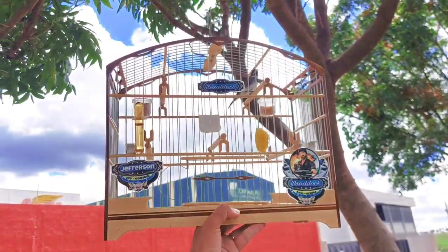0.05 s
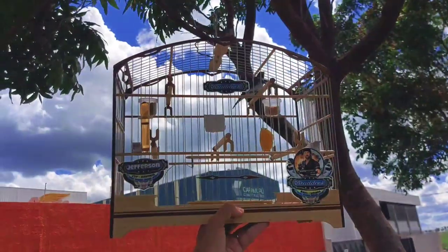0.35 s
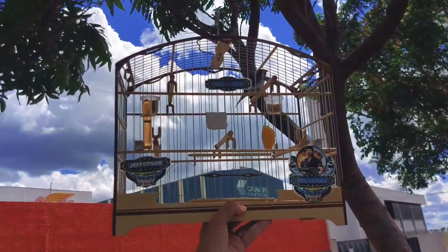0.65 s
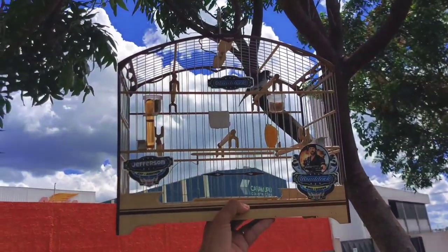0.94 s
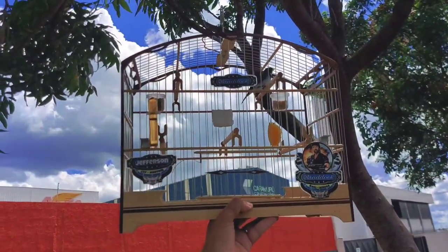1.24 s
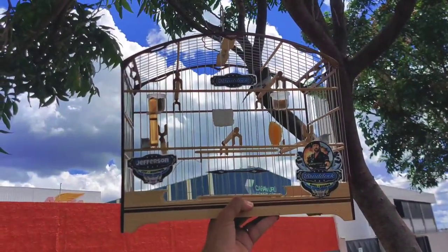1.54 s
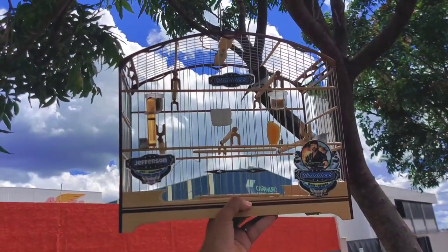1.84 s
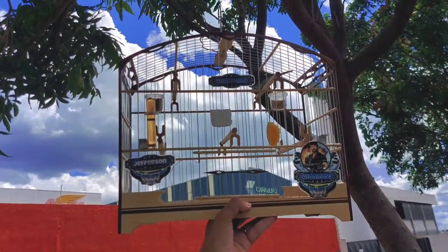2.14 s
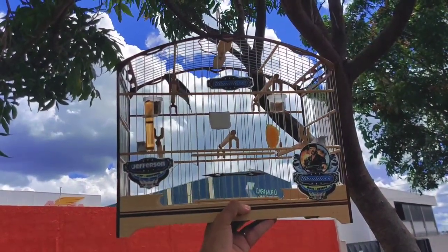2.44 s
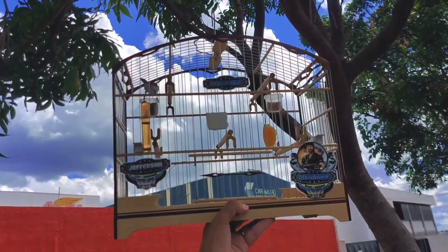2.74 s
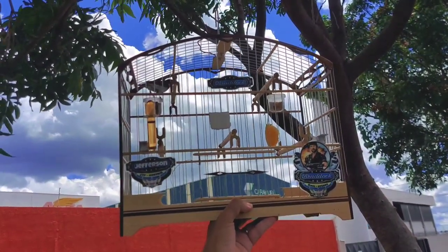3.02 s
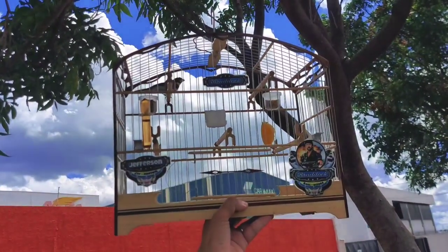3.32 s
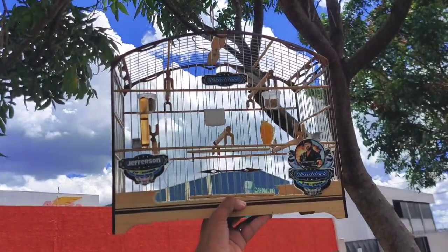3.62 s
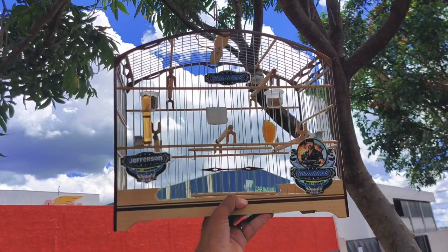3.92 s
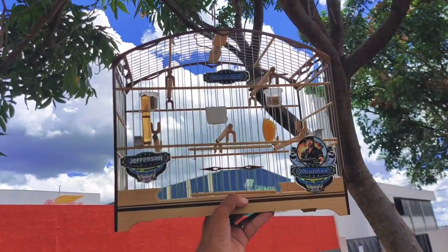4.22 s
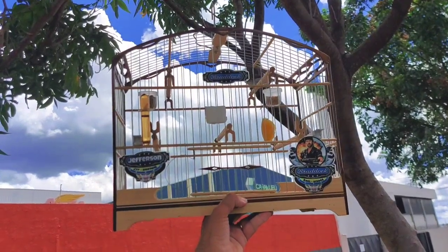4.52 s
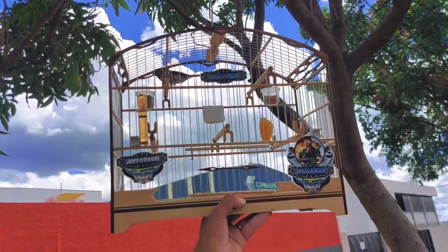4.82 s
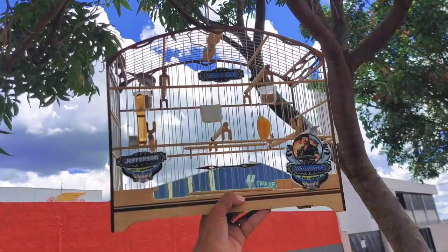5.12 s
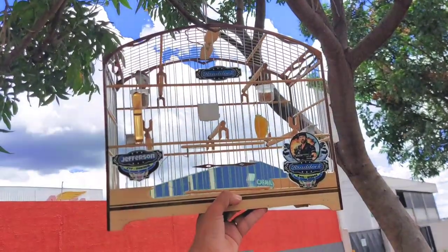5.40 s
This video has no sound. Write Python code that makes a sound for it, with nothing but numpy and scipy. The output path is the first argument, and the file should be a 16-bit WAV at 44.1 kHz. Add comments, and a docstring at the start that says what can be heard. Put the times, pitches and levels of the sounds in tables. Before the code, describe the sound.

Close to the microphone, a small caged bird opens with a reedy buzz, a rising whistle and two fast tumbling runs. After that, only quieter birds are heard: thin falling calls far off and scattered chirps in the trees. Wings rustle faintly and feet tick on perches, while a second bird replies with whistles, slurs and a short trill. Light wind, distant traffic and hissing leaves continue underneath.

```python
"""Light wind, distant traffic and hissing leaves run throughout. At once a caged seedeater under a tree
sings a reedy buzz, a rising whistle and two tumbling runs, tones of its syrinx that a garden wall echoes.
As it ends, a far bird starts repeating a thin falling 'tsee'; then others chirp in the trees.
A faint, far nasal call sounds from 2.3 to 2.85 s, as wings start to rustle and feet tick on the perches.
From about 3 s a second bird replies with whistles, slurs and a trill, followed by a faint echo."""
import sys
import numpy as np
from scipy import signal
from scipy.fft import rfft, irfft, next_fast_len
from scipy.io import wavfile
from scipy.ndimage import map_coordinates

SR = 44100
rng = np.random.default_rng(int(sys.argv[2]) if len(sys.argv) > 2 else 0)


def bounce(signal):
    """Save signal as a 16-bit WAV file at the path given by the first command-line argument."""
    frames = np.transpose(np.atleast_2d(signal))
    limited = np.clip(frames, -1, 1)
    pcm = np.round(limited * 32767).astype(np.int16)
    wavfile.write(sys.argv[1], SR, pcm)


N = 245195
TIME_S = np.arange(N) / SR
SIDES = np.array([[.5], [-.5]])  # splits a left-right difference


def amp(db):
    """Amplitude from dB."""
    return 10 ** (np.asarray(db) / 20)


def along(points, hz):
    """Interpolate (Hz, value) points on a log axis."""
    knots_hz, values = np.transpose(points)
    return np.interp(np.log(hz + 1), np.log(knots_hz + 1), values)


def curve(points):
    """Interpolate (seconds, value) points at every sample."""
    return np.interp(TIME_S, *np.transpose(points))


def wobble(rate_hz):
    """Smooth random curve, rate_hz knots a second."""
    knots = rng.standard_normal(int(N * rate_hz / SR) + 4)
    return map_coordinates(knots, [TIME_S * rate_hz])


def filtered(x, response):
    """Apply a complex response, given as a function of Hz."""
    size = next_fast_len(N + SR // 2)
    return irfft(rfft(x, size) * response(np.fft.rfftfreq(size, 1 / SR)), size)[..., :N]


def note(start_s, end_s, edge_s):
    """Sample indices of a note, its progress 0-1 and its soft-edged gate."""
    i = np.arange(max(int(start_s * SR), 0), min(int(max(end_s, start_s + .004) * SR), N))
    u = np.linspace(0, 1, len(i))
    ramp = np.clip(np.minimum(u, 1 - u) * len(i) / SR / edge_s, 0, 1)
    return i, u, np.sin(ramp * np.pi / 2) ** 2


def arch(u, first, middle, last):
    """Parabola through three values over a note."""
    return middle + (last - first) * (u - .5) + 2 * (first + last - 2 * middle) * (u - .5) ** 2


def phase_of(hz):
    """Running phase of a moving frequency."""
    return 2 * np.pi * np.cumsum(hz) / SR


def saw(phase):
    """Rounded swing: quick rise, slow fall."""
    return np.sin(phase) + np.sin(2 * phase) / 3


def placed(x, lag_ms):
    """A source to one side reaches the left channel lag_ms later."""
    return filtered(x, lambda hz: np.exp(-2j * np.pi * hz * SIDES * lag_ms / 1000))


def diffuse(x, decay):
    """Dense reflections, different at each ear, dying away by (Hz, t60 in seconds) points."""
    hz, t, spectra = signal.stft(rng.standard_normal((2, SR // 2)), SR, nperseg=256)
    tail = signal.istft(spectra * amp(-60 * t / along(decay, hz)[:, None]), SR, nperseg=256)[1]
    return signal.fftconvolve(x[None], tail / np.linalg.norm(tail[0]), axes=1)[:, :N]


# Stereo likeness of noise. Each row: frequency in Hz, left-right correlation.
CORRELATION = [(40, 0.53), (120, 0.4), (300, 0.84), (600, 0.5), (1100, -0.65), (2000, 0.037), (3000, 0.055),
               (6000, 0.064)]

def rush(spectrum):
    """Stereo noise of rms 1 shaped by (Hz, dB) points, alike in the bass, unrelated in the treble."""
    def response(hz):
        angle = np.arccos(np.clip(along(CORRELATION, hz), -1, 1)) / 2
        return amp(along(spectrum, hz)) * [np.cos(angle), np.sin(angle)]
    mid, side = filtered(rng.standard_normal((2, N)), response)
    noise = np.array([mid + side, mid - side])
    return noise / np.sqrt(np.mean(noise ** 2) + 1e-20)


# Wind rumble. Each row: frequency in Hz, relative density in dB.
WIND_SPECTRUM = [(12, -42), (20, -29), (53, -2), (97, -0.5), (114, -7), (135, -5), (195, -20.5),
                 (260, -20.5), (340, -25.5), (570, -120)]
# Gusts. Each row: start in seconds, length in seconds, level in dB.
WIND_GUSTS = [(0.124, 0.047, -46.5), (0.379, 0.023, -50), (0.491, 0.079, -38.5), (0.772, 0.1, -47.5),
              (1.349, 0.059, -45), (1.573, 0.11, -47), (1.813, 0.14, -41.5), (2.142, 0.079, -42),
              (2.275, 0.054, -49.5), (2.422, 0.019, -44), (2.527, 0.03, -42), (3.094, 0.035, -40),
              (3.34, 0.045, -45.5), (3.522, 0.095, -47), (3.836, 0.044, -49), (4.023, 0.079, -45.5),
              (4.168, .012, -50), (4.234, 0.013, -50), (4.49, 0.021, -43), (5.032, 0.09, -44),
              (5.26, 0.028, -49.5), (5.47, 0.076, -44)]

def wind(calm_db=-52.5, crest_db=2):
    """Wind buffets the microphones: a restless rumble that swells with each gust."""
    power = amp(calm_db + 3.3 * wobble(7.1)) ** 2
    for start, length, db in WIND_GUSTS:
        width_s = .0083 + .4 * length
        power += amp(db + crest_db) ** 2 * np.exp(-((TIME_S - start - length / 2) / width_s) ** 2)
    return np.sqrt(power) * rush(WIND_SPECTRUM)


# Tyre roar over time. Each row: time in seconds, level in dB.
TYRE_LEVELS = [(0.0, -49), (0.06, -55), (0.66, -56), (0.9, -58.5), (2.14, -56), (2.32, -52.5), (2.34, -56),
               (5.56, -57)]
# Its colour. Each row: frequency in Hz, relative density in dB.
TYRE_SPECTRUM = [(110, -4), (180, 2), (249, -5), (335, -2.5), (398, -7.5), (502, -5.5), (778, -16),
                 (973, -13.5), (1300, -17), (1690, -27), (2860, -120)]

def tyres(gain_db=3, flutter_db=.7):
    """Distant tyres roar on the road, fluttering slightly."""
    return amp(curve(TYRE_LEVELS) + gain_db + flutter_db * wobble(9)) * rush(TYRE_SPECTRUM)


# Engine drone. Each row: time in seconds, level in dB.
ENGINE_LEVELS = [(0, -48.5), (.5, -61.5), (.8, -57), (1.4, -64), (1.78, -38.5), (2.03, -55), (2.17, -41.5),
                 (2.95, -57.5), (3.6, -47.5), (3.78, -65), (4.08, -45), (4.35, -69), (5.25, -64),
                 (5.54, -42)]

def engine(hz=108, jitter=.06, waver_db=3.2, waver_hz=28):
    """A far engine drones on one unsteady tone."""
    level_db = curve(ENGINE_LEVELS) + waver_db * wobble(waver_hz)
    pitch = hz * (1 + jitter * wobble(waver_hz))
    return amp(level_db) * np.sin(phase_of(pitch))


# Leaf hiss. Each row: frequency in Hz, relative density in dB.
LEAF_SPECTRUM = [(500, -13), (1100, -38), (1500, -7), (2100, -3.5), (2650, -13), (4000, -7), (5500, -11),
                 (7500, -14.5), (10000, -21.5), (12500, -18.5), (14500, -24.5), (15500, -52)]

def leaves(level_db=-63):
    """Leaves hiss almost steadily."""
    return amp(level_db + .31 * wobble(4.72)) * rush(LEAF_SPECTRUM)


# Feet on perch and bars. Each row: time in seconds, relative peak in dB.
FOOT_TICKS = [(2.5105, -62), (2.842, -48), (3.148, -41.5), (4.8576, -53), (5.175, -41)]
# Wing flutters. Each row: middle in seconds, half length in seconds, level in dB.
WING_FLUTTERS = [(2.57, .13, -69), (2.78, .07, -69), (3.13, .05, -65), (3.6, .08, -68), (4.78, .1, -69),
                 (5.52, .06, -69)]

def hops(tick_t60_s=.0064, wingbeat_hz=27, beat_db=4.2):
    """Claws tick and wings rustle in quick beats, both as bursts of bright noise."""
    ticks = sum(amp(db - 5 - 60 * np.abs(TIME_S - s) / tick_t60_s) * (TIME_S >= s)
                for s, db in FOOT_TICKS)
    wings = sum(amp(db) * np.exp(-((TIME_S - s) / half) ** 2) for s, half, db in WING_FLUTTERS)
    beats = amp(beat_db * np.sin(2 * np.pi * wingbeat_hz * TIME_S))
    return (ticks + wings * beats) * rush([(500, -18), (2000, -3.5), (6000, 2), (9000, -6), (15000, -19)])


# Thin high calls. Each row: start in seconds, level in dB.
TSEE_CALLS = [(0.836, -56.5), (1.546, -56), (2.185, -54.5), (2.946, -58.5), (3.365, -56.5), (3.936, -55.5),
              (4.649, -58.5)]
# One call's contour. Each row: seconds into the call, pitch in Hz, gain in dB.
TSEE_CONTOUR = [(0, 9250, -8.5), (0.032, 9470, -4.5), (0.047, 8540, -3), (.065, 8500, -7.5),
                (0.087, 7450, -3.5)]

def tsee(jitter=.014):
    """A far bird repeats one thin tone, held and then dropped."""
    out, drift = np.zeros(N), wobble(700)
    knots_s, hz, gain_db = np.transpose(TSEE_CONTOUR)
    for start, db in TSEE_CALLS:
        i, u, gate = note(start, start + knots_s[-1], edge_s=.0027)
        age_s = u * knots_s[-1]
        pitch = np.interp(age_s, knots_s, hz) * (1 + jitter * drift[i])
        out[i] += gate * amp(db + np.interp(age_s, knots_s, gain_db)) * np.sin(phase_of(pitch))
    return out


def twitter(leads, count=2, spread_s=.05, length_s=.035, hz=4400, glide_hz=900, gain_db=-11.5):
    """Rows for the fainter, raspy chirps of further birds, scattered around each leading chirp."""
    rows = []
    for lead_s, _, _, _, db, _ in leads:
        for delay, stretch, lift, slope in rng.standard_normal((count, 4)):
            start = lead_s + spread_s * (1 + delay)
            if start < N / SR - length_s:
                rows.append((start, length_s * np.exp(stretch / 3), hz * np.exp(.12 * lift),
                             glide_hz * slope, db + gain_db, 1))
    return rows


# Tree birds. Each row: start in seconds, length in seconds, pitch in Hz, glide in Hz, level in dB, rasp.
TREE_CHIRPS = [(1.342, .054, 5350, -700, -55.5, .5), (1.428, .042, 5250, -500, -59.5, .9),
               (1.461, .046, 5200, -600, -59, .4), (1.558, .04, 4150, 200, -62, .6),
               (1.726, .046, 4570, 0, -59, .9), (1.783, .045, 4100, -100, -63, .9),
               (2.086, .033, 4750, 400, -59, .7), (2.113, .04, 5850, -900, -57, .3),
               (2.147, .043, 4050, -1400, -65.5, .5), (2.201, .036, 4880, 800, -56, .3),
               (2.283, .036, 4900, 400, -63, .3), (2.331, .025, 4750, 0, -60, .3),
               (2.348, .035, 5300, 600, -57.5, .7), (2.407, .026, 4330, 100, -57, .2),
               (2.587, .041, 5100, 600, -56, .3), (2.659, .027, 4250, -500, -62, .9),
               (2.7, .048, 4550, -100, -64, .8), (2.8, .04, 3700, -900, -57.5, .2),
               (2.844, .039, 5050, 450, -54.5, .4), (2.917, .03, 3950, 500, -61, .5),
               (3.108, .056, 5100, -500, -58, .9), (3.153, .037, 4000, -1200, -61, .6),
               (3.188, .035, 3950, 200, -62, .9), (3.399, .062, 4230, -100, -65, .6),
               (3.784, .05, 5600, -300, -62, 1), (3.805, .05, 4550, 200, -59, .6),
               (3.865, .046, 4200, -300, -55.5, 1), (4.229, .042, 5520, -100, -56.5, 1),
               (4.278, .046, 5440, -200, -56.5, 1), (4.323, .026, 5950, -200, -58, .1),
               (4.367, .045, 4820, 0, -61.5, .9), (4.39, .028, 3750, -600, -60, .4),
               (4.659, .055, 5450, 0, -63, 1), (4.68, .04, 4200, -300, -64, .6),
               (4.733, .047, 5370, -300, -65, 1), (4.807, .04, 5500, 0, -67.5, 1),
               (4.87, .045, 4500, 900, -68, .5), (5.034, .035, 4750, -200, -62, .9),
               (5.045, .045, 5100, -300, -63, .8), (5.088, .032, 4550, -900, -65, .8),
               (5.19, .028, 4430, -400, -63, .6), (5.229, .058, 5420, -100, -57.5, 1),
               (5.325, .047, 4350, 0, -62.5, 1), (5.372, .035, 3810, 0, -65, .3),
               (5.515, .04, 4700, 300, -66, .9)]
# Lines beside a chirp's tone. Each row: offset in steps, level in dB.
SYRINX_SIDEBANDS = [(-2, -12), (-1, -10), (1, -5)]

def chirps(spacing_hz=620, shimmer_db=2.2, hook_depth=.22, hook_s=.0045):
    """Chirps flick up, glide and drop; the two sides of the syrinx beat, adding raspy sidebands."""
    out, drift, bend = np.zeros(N), wobble(900), .012 * wobble(70)
    rows = TREE_CHIRPS + twitter(TREE_CHIRPS)
    lines = [(round(k), amp(db + shimmer_db * wobble(200))) for k, db in SYRINX_SIDEBANDS]
    shimmer = amp(shimmer_db * wobble(220))
    for start, length, hz, glide, db, rasp in rows:
        i, u, gate = note(start, start + length, edge_s=.006)
        hook = hook_depth * (np.exp(-u * length / hook_s) + np.exp((u - 1) * length / hook_s))
        jitter = (.006 + .011 * rasp) * drift[i]
        pitch = (hz + glide * (u - .5)) * (1 - hook + bend[i] + jitter)
        step_hz = spacing_hz * np.exp(rng.normal(0, .1154))
        sidebands = sum(gain[i] * np.sin(phase_of(pitch + k * step_hz)) for k, gain in lines)
        out[i] += amp(db + 1.5) * gate * (shimmer[i] * np.sin(phase_of(pitch)) + rasp * sidebands)
    return out


def glides(rows, bow=0):
    """Turn pitch and glide into start, middle and end pitch; both ends sag by the share bow."""
    return [(start, length, hz * (1 - bow) - glide / 2, hz, hz * (1 - bow) + glide / 2, *rest)
            for start, length, hz, glide, *rest in rows]


# What the beak passes of overtones and hiss. Each row: frequency in Hz, gain in dB.
BEAK_RESPONSE = [(3000, 0), (6000, 5), (8500, 0), (10000, -1.5), (11500, 3.5), (13200, -4), (15000, -11)]

def syrinx(notes, pan, lag, fade_db, edge_s, rasp=0, overtone_db=-32, hiss_db=-44,
           waver=0, waver_db=0, waver_hz=75, trill_swing_hz=0, trill_db=0, trill_rate_hz=117):
    """Nearly pure tones: swell to mid-note, then fade. Rasp adds unsteadiness, overtones and hiss."""
    out = np.zeros((2, N))
    drift = (.003 + .008 * rasp) * wobble(900)
    shimmer_db = (.3 + .6 * rasp) * wobble(450)
    drift += waver * wobble(waver_hz)
    shimmer_db += waver_db * wobble(waver_hz)
    hiss = rush([(1800, -2)] + BEAK_RESPONSE)
    trill_phase = phase_of(trill_rate_hz * (1 + .1 * wobble(39)))
    for start, length, *contour_hz, db, swell_db in notes:
        i, u, gate = note(start, start + length, min(edge_s, length / 2))
        glide = arch(u, *contour_hz)
        pitch = glide * (1 + drift[i]) + trill_swing_hz * saw(trill_phase[i])
        level_db = db - arch(u, swell_db, 0, fade_db) + shimmer_db[i] - trill_db * np.cos(trill_phase[i])
        phase = phase_of(pitch) - 2 * np.pi * glide * SIDES * along(lag, glide) / 1000
        overtones = sum(amp(along(BEAK_RESPONSE, k * pitch)) * np.sin(k * phase) * (k * pitch < SR / 2)
                        for k in range(2, 5))
        voice = np.sin(phase) + amp(overtone_db + 3 * rasp) * overtones
        # Hiss grows more slowly than the tone, so soft notes are the harshest.
        harsh = rasp * amp(hiss_db + level_db / 2) * hiss[:, i]
        out[:, i] += gate * (np.sqrt(2) * amp(level_db) * voice + harsh) * amp(SIDES * along(pan, glide))
    return out


# Notes from the second bird's side, in four tables. Each row: start in seconds, length in seconds,
# pitch in Hz, glide in Hz, level in dB, swell in dB.
# The first holds two overtones of the far nasal call, then the reply's whistles from 3 s;
# its row at 4.17 s is a faint echo of the second bird's last notes.
WAVERING_TONES = [(2.365, .09, 3650, 520, -58, 2), (2.52, .27, 4380, -100, -65, 2),
                  (3.04, .105, 4690, 200, -52.5, 15), (3.254, .044, 5250, 1100, -51.5, 9),
                  (3.298, .152, 4530, 360, -49.5, 3), (3.537, .134, 4034, 580, -47.5, 6),
                  (3.768, .026, 3700, -150, -48.5, 0), (3.918, .036, 4900, 0, -48, 2),
                  (3.975, .03, 4900, 0, -51, 0), (4.17, .04, 4200, 0, -60, 0),
                  (4.262, .015, 1740, 55, -51.5, 3)]
REPLY_SLURS = [(3.497, .0355, 3550, -1100, -54, 3), (3.729, .034, 3350, -1100, -51.5, 2),
               (3.8, .05, 3660, -950, -42, 13), (3.857, .026, 5150, -1100, -50, 0),
               (3.892, .022, 4850, -700, -48.5, 3), (4.003, .013, 6450, -1100, -51.5, 0),
               (4.056, .029, 4430, -900, -43.5, 5)]
REPLY_FLICKS = [(4.041, .012, 5900, 1500, -54, 0), (4.051, .01, 4050, 1600, -47.5, 4),
                (4.052, .012, 6700, 2700, -52, -2)]
REPLY_TRILL = [(4.083, .043, 3700, -600, -52.5, -2)]
# Their balance. Each row: frequency in Hz, left minus right in dB.
REPLY_PAN_DB = [(1800, 10), (4000, -6.5)]
# Their direction. Each row: frequency in Hz, left lag in ms.
REPLY_LAG_MS = [(1800, -0.4), (3900, -0.54), (4800, -0.51), (6500, -0.524)]

def second_bird(rasp=1.1):
    """After the far nasal call's overtones, a bird whistles, slurs, flicks up and trills; an echo follows."""
    place = dict(pan=REPLY_PAN_DB, lag=REPLY_LAG_MS)
    quick = dict(place, rasp=rasp, edge_s=.004)
    wavering = dict(waver=.009, waver_db=2)
    tones = syrinx(glides(WAVERING_TONES, bow=.0097), fade_db=0, edge_s=.012, **place, **wavering)
    slurs = syrinx(glides(REPLY_SLURS, bow=.038), fade_db=7, overtone_db=-41, hiss_db=-47,
                   **quick, **wavering)
    flicks = syrinx(glides(REPLY_FLICKS), fade_db=7, overtone_db=-36, hiss_db=-54, **quick)
    trill = syrinx(glides(REPLY_TRILL, bow=-.03), fade_db=-3, overtone_db=-37, hiss_db=-41,
                   trill_swing_hz=340, trill_db=5, **quick)
    return tones + slurs + flicks + trill


def reedy_tone(pitch, throat, lag_ms):
    """Eight harmonics weighted by the throat's resonances, lag_ms later on the left."""
    phase = phase_of(pitch) - 2 * np.pi * pitch * SIDES * lag_ms / 1000
    return sum(amp(along(throat, k * pitch)) * np.sin(k * phase) for k in range(1, 9))


# Nasal calls, two close and one far. Each row: start and end in seconds, start, middle and end pitch
# in Hz, level in dB, flutter depth in Hz, left lag in ms.
NASAL_CALLS = [(0.469, 0.484, 1590, 1610, 1580, -33.5, 30, 0.48),
               (0.687, 0.702, 1540, 1650, 1600, -38.5, 30, 0.447),
               (2.282, 2.852, 1199, 1490, 1272, -69, 40, -0.47)]
# Throat resonances. Each row: frequency in Hz, gain in dB.
NASAL_FORMANTS = [(1400, -33), (2200, -15), (2950, 12), (4400, -2.5), (6200, -3), (7600, -21), (10000, -18),
                  (14000, -23)]

def nasal_calls(flutter_hz=112, jitter=.032):
    """Low fluttering tones whose overtones are picked out by the throat."""
    out, drift = np.zeros((2, N)), wobble(1400)
    flutter = np.sin(phase_of(flutter_hz * (1 + .072 * wobble(60))))
    for start, end, *contour_hz, db, depth_hz, lag_ms in NASAL_CALLS:
        i, u, gate = note(start, end, edge_s=(end - start) / 5)
        pitch = arch(u, *contour_hz) * (1 + jitter * drift[i]) + depth_hz * (flutter[i] + .23 * drift[i])
        out[:, i] += gate * amp(db) * reedy_tone(pitch, NASAL_FORMANTS, lag_ms)
    return out


# Throat resonances in the buzz. Each row: frequency in Hz, gain in dB.
BUZZ_FORMANTS = [(1500, -30), (2400, -16), (2950, 2), (3600, 5), (4250, -6.5), (4700, -9), (5200, -4),
                 (5750, -14), (6300, -9.5), (6900, -16), (7700, -21), (9400, -22), (11000, -32),
                 (14000, -36)]

def buzz(start_s=.087, end_s=.217, hz=1605, jitter=.038, swing_hz=115, swing_db=1, shimmer_db=1.8):
    """A swelling reedy tone flutters ever more slowly, sweeping overtones through the throat."""
    out = np.zeros((2, N))
    i, u, gate = note(start_s, end_s, edge_s=.016)
    flutter_hz = np.interp(u, [0, 1], [160, 105]) * (1 + .3 * wobble(110)[i])
    swing = saw(phase_of(flutter_hz))
    climb = .17 * np.exp((i / SR - end_s) / .017)  # leads into the whistle
    pitch = hz * (1 + climb + jitter * wobble(1400)[i]) + swing_hz * swing
    level_db = np.interp(u, [0, 1], [-44.5, -39]) - swing_db * swing + shimmer_db * wobble(260.7)[i]
    out[:, i] = gate * amp(level_db) * reedy_tone(pitch, BUZZ_FORMANTS, lag_ms=.429)
    return out


# The tumbling run. Each row: seconds into the run, length in seconds, start, middle and end pitch in Hz,
# level in dB, swell in dB.
RUN_NOTES = [(0.002, .008, 6600, 7000, 7600, -33, 5), (.008, .037, 6750, 6450, 5750, -22.5, 7),
             (.047, .028, 5550, 5250, 4950, -19.8, 4), (.077, .026, 3700, 4430, 4850, -16.3, 9),
             (.106, .014, 3450, 3800, 4050, -20.5, 6), (.117, .047, 2720, 3060, 2480, -23.5, 3)]
# Each row is one run: start in seconds, spacing factor, initial pitch lift as a share, gain in dB.
RUN_REPEATS = [(0.373, 1.002, 0, -3.5), (0.58, 1.113, 0.21, -6.5)]

def tumbling_runs(settle_s=.045, highest_hz=7830):
    """Notes of the run sung twice, the second time higher at first, slower and softer."""
    notes = []
    for start, stretch, lift, gain_db in RUN_REPEATS:
        for offset, length, *contour_hz, db, swell_db in RUN_NOTES:
            knots_s = offset + length * np.array([0, .5, 1])
            unsettled = np.clip(1 - knots_s / settle_s, 0, 1)
            lifted_hz = np.minimum(contour_hz * (1 + lift * unsettled), highest_hz)
            notes.append((start + offset * stretch, length, *lifted_hz, db + gain_db, swell_db))
    return notes


# Opening whistles. Each row: start in seconds, length in seconds, start, middle and end pitch in Hz,
# level in dB, swell in dB.
OPENING_WHISTLES = [(0, .021, 4300, 4360, 4480, -26, 0), (.204, .077, 3400, 4094, 4190, -20.2, 17)]
# Voice cracks. Each row: start and length in seconds, pitch and glide in Hz, level and swell in dB.
VOICE_CRACKS = [(.128, .007, 4700, -400, -40, 0), (.166, .008, 3750, -300, -37.5, 0),
                (.413, .013, 5750, -300, -41, -4), (.441, .015, 5200, 0, -34, -4),
                (.61, .018, 6450, -500, -33, 0), (.624, .016, 5680, -300, -39, -4),
                (.656, .018, 4530, 0, -40, -4), (.688, .011, 4700, 0, -36, 0)]
# The caged bird's balance. Each row: frequency in Hz, left minus right in dB.
CAGE_PAN_DB = [(2700, 3), (3200, -7), (3700, -2.5), (4200, 1), (4650, -6), (6400, -3), (7600, -10)]
# Its direction. Each row: frequency in Hz, left lag in ms.
CAGE_LAG_MS = [(2700, 0.48), (3300, 0.48), (3700, 0.498), (4500, 0.515), (5200, 0.42), (6000, 0.513),
               (7800, 0.426)]

def caged_bird():
    """A buzz and clean whistles, then two raspy runs; the voice cracks in the buzz and between notes."""
    def sing(notes, **voice):
        return syrinx(notes, CAGE_PAN_DB, CAGE_LAG_MS, **voice)
    return (buzz()
            + sing(OPENING_WHISTLES, fade_db=2, edge_s=.006, rasp=.3, overtone_db=-38)
            + sing(tumbling_runs(), fade_db=3.5, edge_s=.01, rasp=1.2, overtone_db=-33, hiss_db=-46)
            + sing(glides(VOICE_CRACKS), fade_db=4, edge_s=.006, rasp=4, overtone_db=-36, hiss_db=-48))


# Reflections. Each row: delay in seconds, gain in dB.
ECHO_TAPS = [(.0065, -18.5), (0.0168, -19), (0.018, -34), (0.056, -27.5)]

def echoes(x):
    """Distinct echoes from trunk, ground and wall."""
    return filtered(x, lambda hz: sum(amp(db) * np.exp(-2j * np.pi * hz * s) for s, db in ECHO_TAPS))


# Decay of the yard and of the cage's bars and perches. Each row: frequency in Hz, t60 in seconds.
YARD_DECAY = [(500, 0.12), (4000, 1), (9000, 0.73), (15000, 0.057)]
CAGE_DECAY = [(3000, .075), (12000, .09)]

def scene():
    """The caged bird is close and dry; the further a bird, the more of it comes through the yard."""
    background = wind() + tyres() + engine() + leaves() + hops()
    close, reply, high, far = caged_bird() + nasal_calls(), second_bird(), tsee(), chirps()
    bars = amp(-11) * diffuse(close[1], CAGE_DECAY)
    cage = close + echoes(close) + bars + amp(-35) * diffuse(close[1], YARD_DECAY)
    foliage = amp(-8) * diffuse(reply[1], [(3000, .05), (9000, .04)])
    neighbour = amp(-3) * (reply + foliage) + amp(-24) * diffuse(reply[1], YARD_DECAY)
    branches = amp(-1.5) * diffuse(far, [(3000, .16), (12000, .08)])
    trees = amp([[-2], [3]]) * placed(far, lag_ms=-.491) + branches + amp(-19) * diffuse(far, YARD_DECAY)
    treetop = amp(-15) * placed(high, lag_ms=-.46) + amp(-1) * diffuse(high, YARD_DECAY)
    return cage + neighbour + trees + treetop + background


def record(dry):
    """Brick-wall low-pass at 15450 Hz."""
    return filtered(dry, lambda hz: hz < 15450)


dry = scene()
out = record(dry)
bounce(out)
```